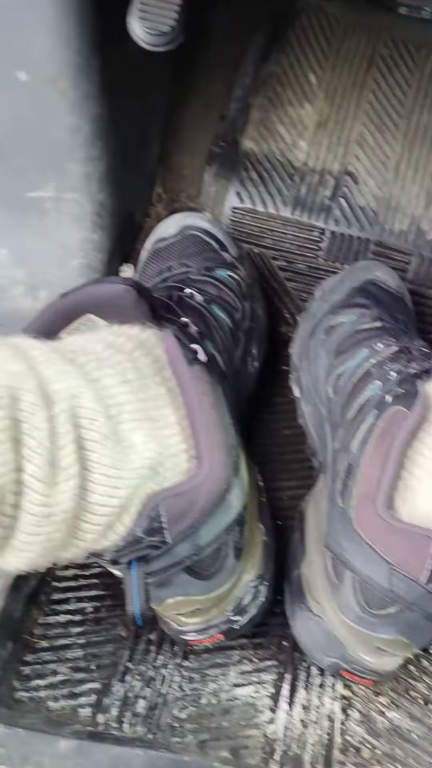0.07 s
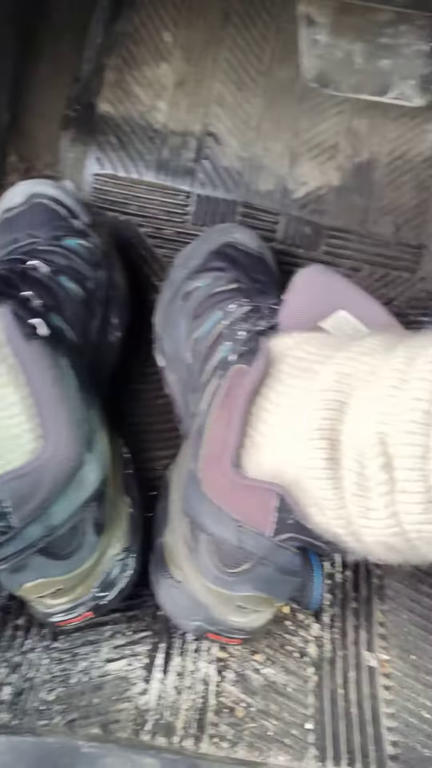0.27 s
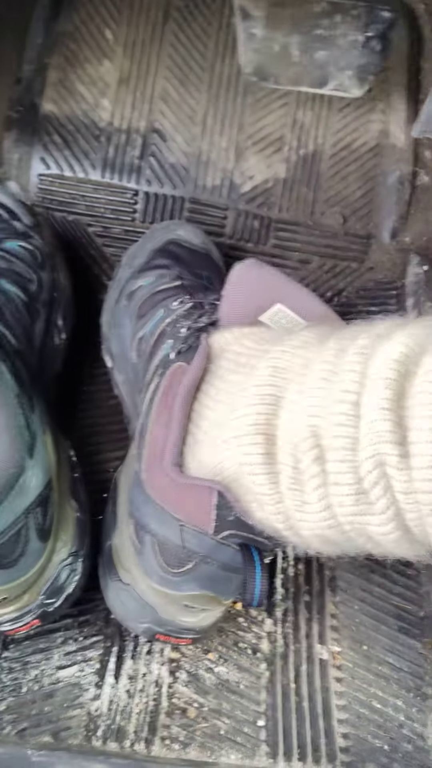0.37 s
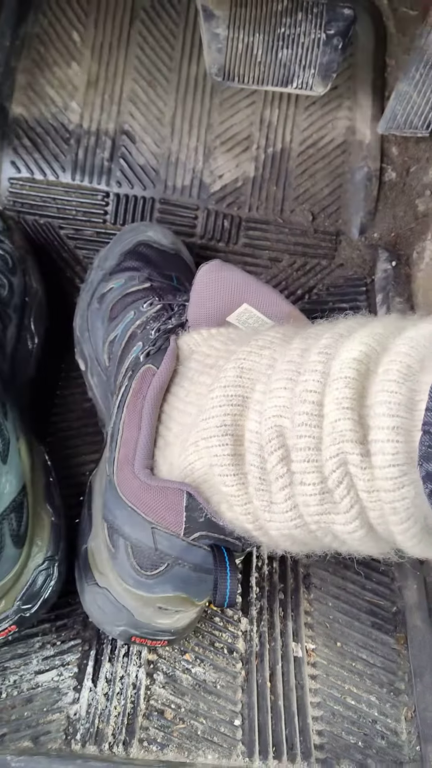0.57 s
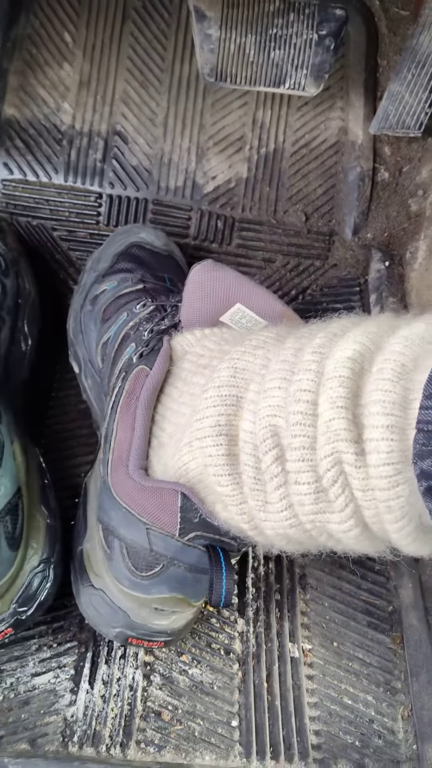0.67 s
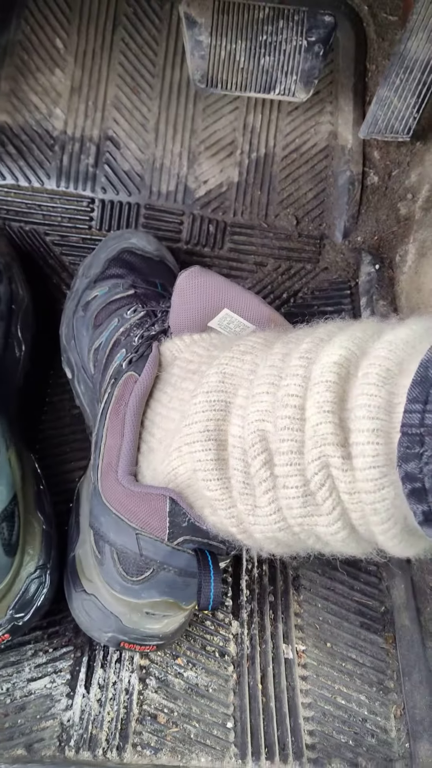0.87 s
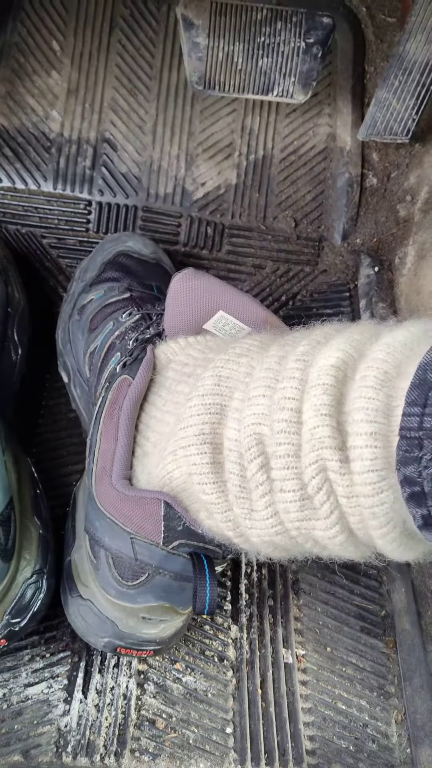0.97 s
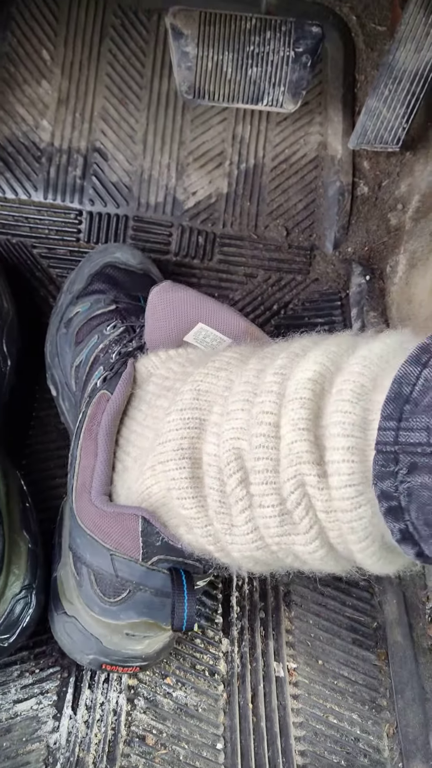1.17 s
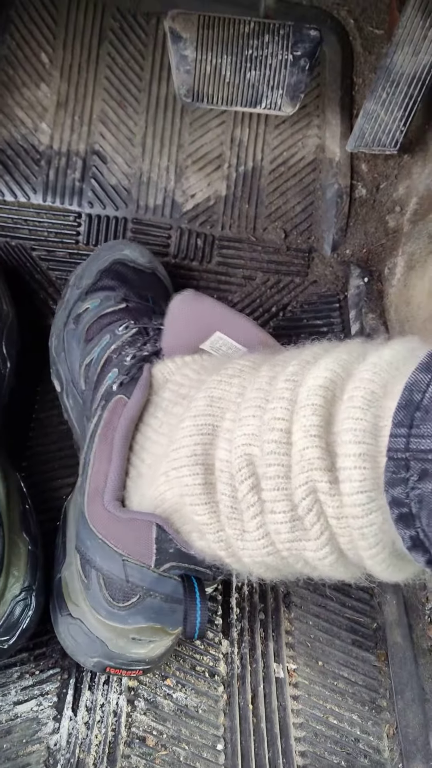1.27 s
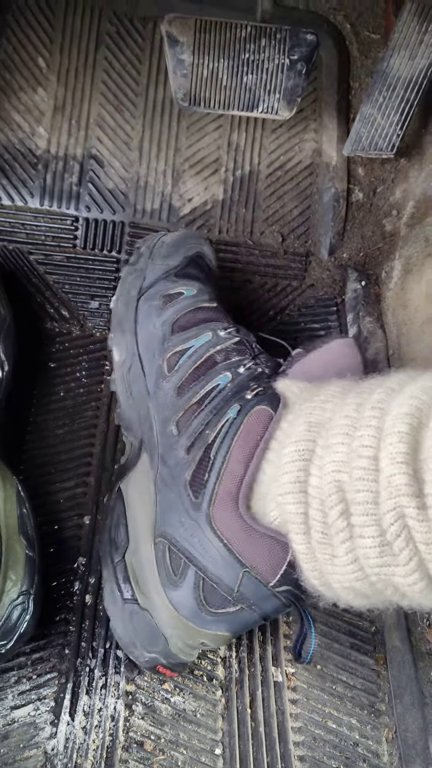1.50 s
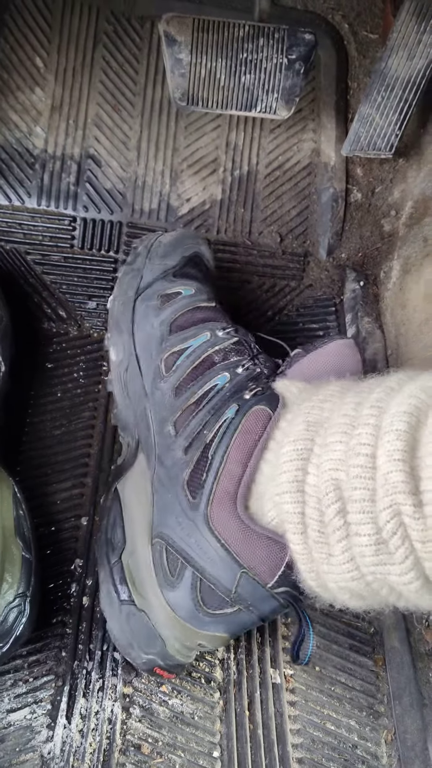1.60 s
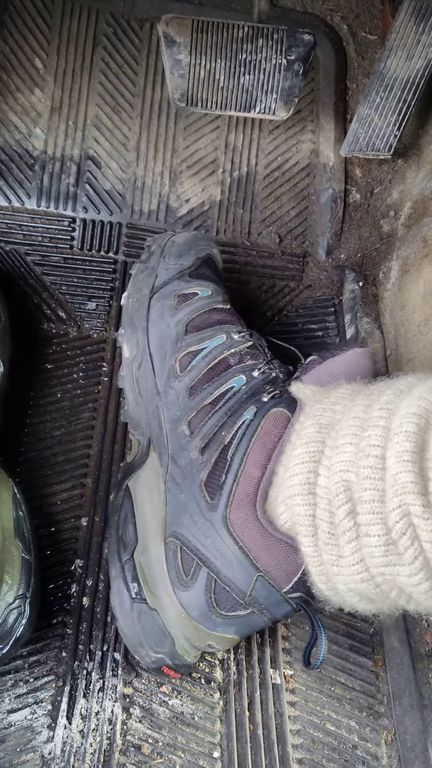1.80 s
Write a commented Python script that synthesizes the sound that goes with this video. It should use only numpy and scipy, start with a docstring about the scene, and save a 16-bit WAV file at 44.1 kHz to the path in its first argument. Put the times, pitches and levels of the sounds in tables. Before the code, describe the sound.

Walking shoes shuffle on a rubber floor mat, close to the microphone in a quiet car's footwell. Soft thuds and brief rasping drags build, then ease into a few lighter scuffs and taps while socks and trousers rustle faintly.

```python
"""The footwell of a quiet, parked car, where walking shoes shift about on a ribbed rubber mat.
Each scuff is a short run of slips: the floor thuds under it, the rubber rasps and grit crackles.
Soles knock on the mat and tread edges snap over its ribs.
Clothing rustles faintly between the moves, over the low hush of the cabin."""
import sys
import numpy as np
from scipy import signal
from scipy.fft import rfft, irfft, next_fast_len
from scipy.io import wavfile
from scipy.ndimage import uniform_filter1d

SR = 44100
rng = np.random.default_rng(int(sys.argv[2]) if len(sys.argv) > 2 else 0)


def unload_wav(signal):
    """Save mono or channel-first audio to the path in sys.argv[1] as 16-bit WAV at rate SR, clipped to [-1, 1]."""
    wavfile.write(
        sys.argv[1],
        SR,
        np.round(np.clip(np.atleast_2d(signal).T, -1, 1) * 32767).astype(np.int16),
    )


N = 81585
T = np.arange(N) / SR


def scuffs():
    """Each drag of a sole drives the floor's thud, the rubber's rasp and the crackle of grit."""
    # drags: t/s at full force, rise/s, hold/s, fall/s, then thud, rasp and grit level/dB before trim
    drags = [ (0.082, .006, 0.033, 0.02, -48.5, -61.5, -78.5), (0.24, .010, 0.019, 0.016, -38, -51, -73),
             (0.275, .010, 0.02, 0.018, -54.5, -74, -83), (0.325, .007, 0.0078, 0.0085, -38.5, -54, -79.5),
             (0.356, .020, 0.019, 0.028, -50, -62.5, -79), (0.407, 0.011, 0.012, 0.0045, -40.5, -55, -82),
             (0.454, .012, .017, 0.013, -32, -45.5, -66.5),
             (0.597, .018, 0.003, 0.022, -44.5, -48.5, -66.5), (0.696, .018, .010, 0.019, -32, -40, -53.5),
             (0.74, .004, 0.0019, .006, -45, -51.5, -79), (0.75, .008, 0.022, 0.017, -39.5, -50.5, -69.5),
             (0.841, .028, 0.0096, 0.027, -44.5, -56.5, -71.5),
             (0.894, 0.006, 0.017, 0.021, -55.5, -69.5, -72.5),
             (0.953, .020, 0.0099, 0.025, -32, -43, -55.5), (0.977, .010, .009, 0.012, -41, -59, -73.5),
             (1.013, .008, 0.013, 0.0107, -61, -69.5, -83), (1.041, .008, 0.035, 0.0059, -55, -65, -77.5),
             (1.18, .011, 0.011, 0.013, -47.5, -58.5, -78),
             (1.226, .018, 0.029, 0.016, -49.5, -62.5, -76.5), (1.310, .026, 0.019, 0.007, -42, -54, -71),
             (1.362, .018, 0.015, 0.029, -49, -57, -79.5), (1.802, .011, 0.019, 0.015, -48, -59, -76.5), ]
    # tone colours of the three layers: f/Hz, level/dB
    thud = [(25, -24.5), (50, -10), (90, 0.5), (170, 3.5), (280, -7.5), (380, -9.5), (600, -25.5),
            (1500, -66)]
    rasp = [(150, -16), (330, 1.5), (420, -0.5), (530, -3), (680, -4.5), (900, -11), (1040, -12.5),
            (1220, -17), (1480, -20.5), (1750, -22), (2300, -30), (5000, -64.5)]
    grit = [(600, -12.5), (1400, 12.5), (1750, -9), (2020, 7), (2450, -1), (3100, -0.5), (4000, -5.5),
            (5500, -9), (7600, -13.5), (10000, -14.5)]
    layers = np.array([friction(per_s=500, spread_db=1.5, colour=thud),
                       friction(per_s=1700, spread_db=3.5, colour=rasp),
                       friction(per_s=3500, spread_db=2, colour=grit)])
    trim_db = np.array([-2, -2, -3.5])
    return sum(from_db(trim_db + levels) @ (stroke(start, rise, hold, fall) * layers)
               for start, rise, hold, fall, *levels in drags)


def stroke(start, rise, hold, fall):
    """Thud, rasp and grit envelopes of one drag: force builds, holds and dies; speed peaks midway."""
    swell_db = [1.5, 3, 3]   # where the sole slides fastest
    fade_db = [25, 26, 19.5]   # loss over one rise or fall time
    outside_hold = np.maximum((start - T) / rise, 0) + np.maximum((T - start - hold) / fall, 0)
    speed = np.exp(-(2 * (T - start - 0.51 * hold) / hold) ** 2)
    envelope_db = np.outer(swell_db, speed) - np.outer(fade_db, outside_hold ** 1.36)
    return from_db(np.maximum(envelope_db, -200))


def knocks():
    """Soft blows ring the damped mat at a pitch set by where they land, and boom in the floor pan."""
    # sole on mat: t/s, push level/dB, pitch/Hz, contact cut-off/Hz, boom/dB relative to the push
    blows = [ (0.044, -62, 144, 388, -6), (0.059, -44.5, 123, 190, -3), (0.077, -42, 184.5, 493, -19),
             (0.111, -45, 145.6, 300, 0), (0.144, -56, 131, 300, -16), (0.232, -36, 182, 400, -4.5),
             (0.284, -45.5, 124, 200, -5), (0.312, -35, 169.3, 220, -6), (0.318, -34.5, 155, 300, -0.5),
             (0.372, -43.5, 124, 500, 3.5), (0.396, -47.5, 132, 350, -6.5),
             (0.448, -20.5, 129.3, 220, -5.5), (0.462, -20, 133.3, 230, -6), (0.53, -61, 150, 510, -9),
             (0.599, -33.5, 133, 200, -10), (0.617, -48.5, 106, 160, -0.5), (0.647, -59, 130, 394, 3),
             (0.682, -28, 166.6, 350, -27.5), (0.696, -22.5, 190, 700, -29), (0.752, -32, 182.5, 800, 1),
             (0.767, -33, 187, 503, -14), (0.899, -24, 154.6, 330, -16), (1.042, -41.5, 124, 230, -6),
             (1.120, -52.5, 155, 330, -1), (1.187, -42, 157, 260, 0), (1.476, -56, 120.4, 330, 0.5),
             (1.536, -60.5, 156, 260, -3), (1.728, -56.5, 148, 600, -6), (1.803, -44, 207, 500, -27), ]
    # modes of the mat on its carpet: multiple of its pitch, gain/dB, t60/s
    mat_modes = [(.95, -1, 0.051), (1.40, -4.5, 0.038), (3.2, -13.5, 0.011)]
    out = np.zeros(N)
    for start, db, pitch_hz, cut_hz, boom_db in blows:
        push = contact(start, db, cut_hz, order=3)
        out += from_db(boom_db) * ring(push, hz=93, t60=0.023)   # floor pan
        for multiple, mode_db, t60 in mat_modes:
            out += from_db(mode_db) * ring(push, pitch_hz * multiple, t60)
    return -out


def snaps():
    """Tread edges let go of the ribs with a dull tick."""
    # an edge slips off a rib: t/s, push level/dB, cut-off/Hz
    releases = [(0.2433, -41.5, 2640), (0.33, -48, 2440), (0.4135, -39, 1227), (0.5970, -45.5, 3930),
                (0.6960, -31.5, 1990), (0.7517, -32.5, 1790), (0.8270, -57, 3500), (0.8971, -32, 1440),
                (0.9560, -30, 2300), (1.3100, -47, 1790), (1.3710, -49, 1590)]
    # modes of the rubber tread: f/Hz, gain/dB, t60/s
    tread_modes = [(542, -4.5, 0.018), (756, -10.5, 0.016), (1083, -22, 0.018), (1345, -21, 0.024),
                   (1477, -23.5, 0.022), (2170, -17, 0.0038), (4430, -15.5, 0.0021)]
    pushes = sum(contact(*release, order=6) for release in releases)
    return sum(from_db(db) * ring(pushes, hz, t60) for hz, db, t60 in tread_modes)


def rustle():
    """Socks and trouser legs rub softly while the feet move."""
    # envelope of the rubbing: t/s, level/dB
    envelope = [(0, -68), (.12, -70), (.2, -71), (.3, -63.5), (.42, -63.5), (.52, -66.5), (.66, -68),
                (.8, -62), (.93, -68.5), (1.1, -71), (1.27, -73), (1.39, -63.5), (1.46, -71.5),
                (1.65, -80.5), (1.85, -77)]
    # tone colour of the fabric: f/Hz, level/dB
    cloth = [(30, -23.5), (100, 13), (220, -8.5), (450, -21), (1000, -26.5), (2200, -32), (4500, -38.5),
             (8000, -43.5)]
    gain = from_db(np.interp(T, *np.transpose(envelope)))
    return gain * friction(per_s=1800, spread_db=2, colour=cloth)


def cabin():
    """The hush of the cabin: a steady bed of dark noise."""
    # room tone: f/Hz, level/dB
    hush = [(20, -8.5), (45, -2.5), (100, 0.5), (160, -9), (250, -16), (360, -9.5), (600, -17.5),
            (1300, -20), (1900, -31.5), (2250, -27.5), (3200, -37.5), (8000, -39.5)]
    return from_db(-75) * coloured(rng.standard_normal(N), hush)


def friction(per_s, spread_db, colour):
    """Random slips of uneven size, given a tone colour and held at a steady level."""
    sizes = from_db(spread_db * np.minimum(rng.exponential(1, N), 4)) * rng.choice([-1, 1], N)
    slips = sizes * (rng.random(N) < per_s / SR)
    rub = coloured(slips, colour)
    width = int(0.014 * SR)   # smoothing time that keeps the rubbing at a steady level
    power = uniform_filter1d(uniform_filter1d(rub * rub, width), width)
    return rub / np.sqrt(power + 0.0011)


def contact(start, db, cut_hz, order):
    """One push; the softer the contact, the lower its cut-off."""
    click = np.full(N, 1e-18)
    click[int(start * SR)] = from_db(db)
    return signal.sosfilt(signal.butter(order, cut_hz, fs=SR, output="sos"), click)


def ring(x, hz, t60):
    """One damped mode; a unit click sets it ringing at height 1."""
    decay, angle = from_db(-60 / (t60 * SR)), 2 * np.pi * hz / SR
    return signal.lfilter([.5, 0, -.5], [1, -2 * decay * np.cos(angle), decay * decay], x + 1e-18)


def coloured(x, points):
    """Minimum-phase EQ through (f/Hz, level/dB) points; the result has rms 1."""
    size = 2 * next_fast_len(N)
    hz, db = np.transpose(points)
    grid_hz = np.maximum(np.arange(size // 2 + 1) * SR / size, 1)
    gain = from_db(np.interp(np.log(grid_hz), np.log(hz), db))
    cepstrum = irfft(np.log(gain))
    cepstrum[1:size // 2] *= 2   # folded forward, so nothing rings ahead of an attack
    cepstrum[size // 2 + 1:] = 0
    shaped = irfft(rfft(x, size) * np.exp(rfft(cepstrum)))[:N]
    return shaped / np.std(shaped)


def from_db(db):
    """Decibels to gain."""
    return 10 ** (np.asarray(db) / 20)


def scene():
    """The feet, close by, over the hush of the cabin, in mono."""
    bed = cabin()
    return (scuffs() + knocks() + snaps() + rustle() + bed)[None]


def record(dry):
    """The small microphone thins the deep bass, loses the top and adds a faint hiss."""
    bass_cut_hz, top_hz, hiss_top_hz = 39, 8000, 10000
    thin = signal.sosfilt(signal.butter(2, bass_cut_hz, "highpass", fs=SR, output="sos"), dry)
    dull = signal.sosfilt(signal.ellip(10, .1, 70, top_hz, fs=SR, output="sos"), thin)
    hiss = from_db(-93) * rng.standard_normal(N)
    return signal.sosfilt(signal.ellip(8, .1, 70, hiss_top_hz, fs=SR, output="sos"), dull + hiss)


dry = scene()
out = record(dry)
unload_wav(out)
```